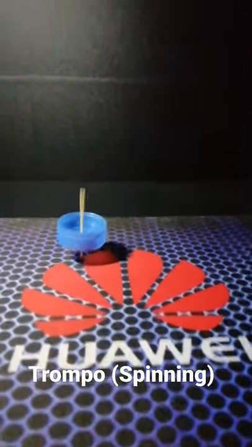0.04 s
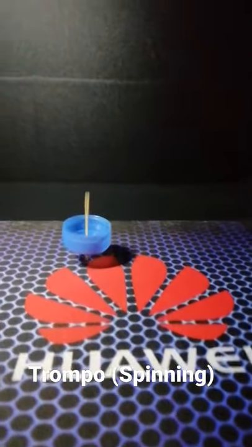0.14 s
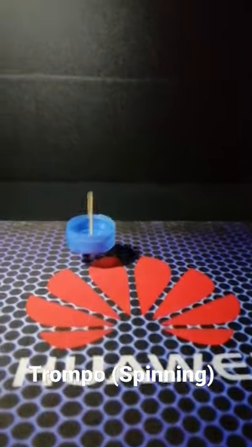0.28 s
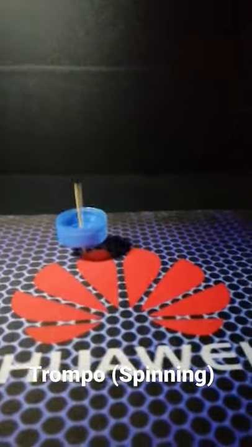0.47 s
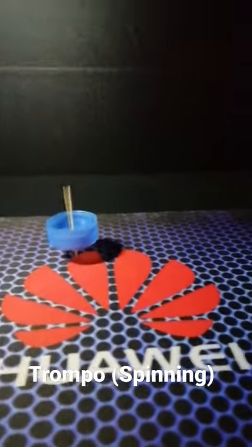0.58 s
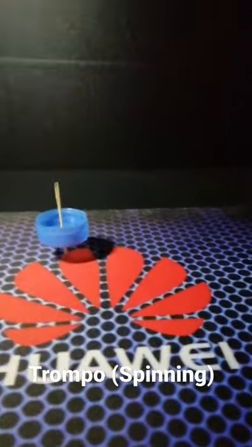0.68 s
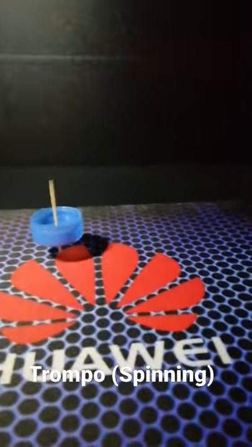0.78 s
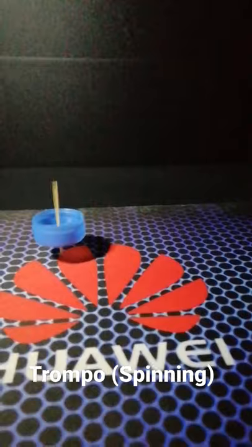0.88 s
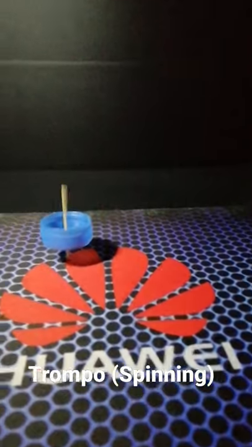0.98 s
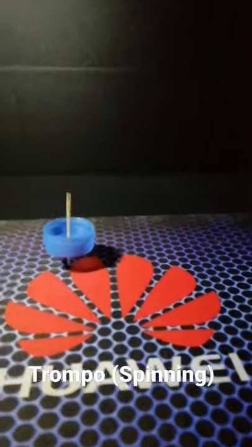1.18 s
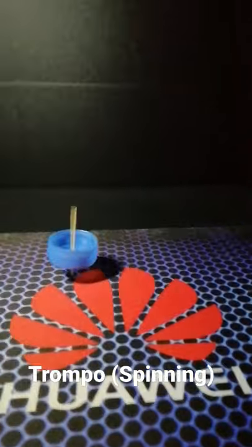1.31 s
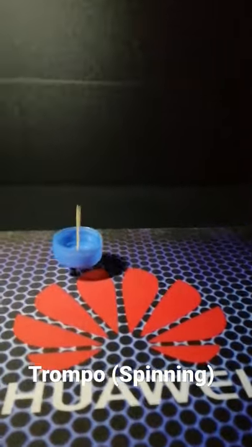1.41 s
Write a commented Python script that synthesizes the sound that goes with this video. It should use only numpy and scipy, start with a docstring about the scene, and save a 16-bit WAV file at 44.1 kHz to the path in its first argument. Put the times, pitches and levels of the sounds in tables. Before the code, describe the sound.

A small top spins on a mat, hissing and scraping, as something brushes the microphone.

```python
"""A bottle-cap top spins on a mat in a quiet room, a little nearer the left microphone than the right.
Its wooden tip hisses, rasps unevenly about twice a turn and catches in short scrapes.
Right on the microphone, something, probably a finger, ticks against the right port,
slides past it with two light taps and leaves.
Underneath lie room rumble and hiss, faint mains hum and soft handling noise."""
import sys
import numpy as np
from scipy import signal
from scipy.fft import rfft, irfft
from scipy.io import wavfile
from scipy.ndimage import uniform_filter1d, map_coordinates

SR = 44100
rng = np.random.default_rng(int(sys.argv[2]) if len(sys.argv) > 2 else 0)


def wrap_up_sound(samples):
    """Save the sound to the file named by the first command line argument, as 16-bit audio."""
    columns = np.atleast_2d(samples).T
    # keep every value between -1 and 1, then stretch to whole-number steps
    tamed = np.clip(columns, -1, 1)
    steps = np.round(tamed * 32767).astype(np.int16)
    wavfile.write(sys.argv[1], SR, steps)


N = 63945
TIME = np.arange(N) / SR


def amp(db):
    """Decibels to gain."""
    return 10 ** (np.asarray(db) / 20)


def unit_rms(x):
    """Scales to rms 1."""
    return x / np.sqrt(np.mean(x ** 2) + 1e-20)


def per_bin(points, size):
    """Reads a curve at each FFT bin, on a log-frequency axis."""
    hz, value = np.transpose(points)
    return np.interp(np.log(np.fft.rfftfreq(size, 1 / SR) + 1), np.log(hz + 1), value)


def fader(points):
    """A level curve as a gain for every sample."""
    return amp(np.interp(TIME, *np.transpose(points)))


def bump(s, width_s, db):
    """A gain that swells to a peak and falls again."""
    return amp(db) * np.exp(-.5 * ((TIME - s) / width_s) ** 2)


def pan(left_db):
    """Stereo gains, the left louder by left_db."""
    return amp([[left_db / 2], [-left_db / 2]])


def add(mix, s, sound):
    """Mixes a sound in at a time."""
    part = mix[..., max(round(s * SR), 0):][..., :sound.shape[-1]]
    part += sound[..., :part.shape[-1]]


def coloured(noise, spectrum):
    """Gives noise a spectrum, at rms 1."""
    size = noise.shape[-1]
    return unit_rms(irfft(rfft(noise) * amp(per_bin(spectrum, size)), size))


def stereo_noise(size, likeness=.65):
    """Noise that is partly alike at the two microphones."""
    left, other = rng.standard_normal((2, size))
    return np.array([left, likeness * left + np.sqrt(1 - likeness ** 2) * other])


def wander(samples):
    """Smooth random drift of rms 1."""
    return unit_rms(uniform_filter1d(uniform_filter1d(rng.standard_normal(N), samples), samples))


# Wooden tip on the mat, spectrum (f/Hz, relative level/dB)
TIP_SPECTRUM = [(1000, -36), (2600, -21.5), (3600, -23.5), (4650, -22), (5000, -15), (5750, -8.5),
                (6700, -25), (7600, -26), (8100, -1), (8450, 3), (8850, -2), (9500, -13.5), (11500, -20.5),
                (13800, -39), (15500, -29)]
# Its rasp between scrapes (t/s, level/dB)
RASP_LEVEL = [(0, -59), (.4, -57), (.75, -58.5), (.87, -59), (1.25, -62), (1.45, -60.5)]
def rasp(pressure):
    """The tip rubs the mat, louder as it presses harder."""
    return coloured(stereo_noise(N) * pressure, TIP_SPECTRUM) * fader(RASP_LEVEL)


# The tip's hiss: spectrum (f/Hz, relative level/dB) and course (t/s, level/dB)
HISS_SPECTRUM = [(2500, -43), (3600, -16), (4600, -20), (4950, 2), (5700, 0), (6500, -11), (7500, -25),
                 (9000, -5.5), (11300, -4.5), (12200, -2.5), (12700, -4), (13600, -44), (15400, 1)]
HISS_LEVEL = [(0, -63), (.35, -62.5), (.65, -61.5), (.8, -63.5), (.9, -66.5), (1.45, -69)]
def tip_hiss(pressure):
    """Steadier friction, stronger at first and mostly on the left microphone."""
    hiss = coloured(stereo_noise(N) * np.sqrt(pressure), HISS_SPECTRUM)
    return hiss * fader(HISS_LEVEL) * pan(left_db=12)


# Peaks of the scrapes on the mat (t/s, relative level/dB)
SCRAPES = [(.006, -39), (.036, -44), (.042, -44), (.056, -39), (.074, -51), (.083, -48), (.089, -46),
           (.111, -49), (.141, -43.5), (.215, -40), (.253, -35), (.287, -37), (.321, -37), (.783, -46),
           (.806, -41), (.842, -48), (.882, -41), (.920, -44.5), (.96, -42), (.977, -48), (.997, -38),
           (1.016, -41), (1.037, -42.5), (1.077, -41), (1.094, -42.5), (1.116, -42), (1.134, -49),
           (1.154, -56), (1.174, -40), (1.194, -44), (1.211, -37.5), (1.230, -45), (1.237, -44),
           (1.252, -43), (1.273, -44.5), (1.335, -45.5), (1.392, -47), (1.439, -43)]
def scrapes(width_s=.0029, gain_db=-18, sway_db=2):
    """The tip catches in short bursts, with sharper resonances than its rasp."""
    out = np.zeros((2, N))
    t = np.arange(-512, 512) / SR
    swell = np.exp(-.5 * (t / width_s) ** 2)
    sharpened = [(hz, db * 1.13) for hz, db in TIP_SPECTRUM]
    for s, db in SCRAPES:
        scrape = coloured(stereo_noise(len(t)) * swell, sharpened)
        gain = amp(db + gain_db) * pan(sway_db * rng.standard_normal())
        add(out, s + t[0], gain * scrape[:, s + t >= 0])
    return out


# Extra distance from the wandering top to the right microphone (t/s, path/m)
EXTRA_PATH = [(.05, 0.1), (.22, 0.09), (1.45, .082)]
def direct_sound(source, sound_m_per_s=343):
    """The right microphone, 8 to 10 cm farther off, hears the top later."""
    left, right = source
    lag_s = np.interp(TIME, *np.transpose(EXTRA_PATH)) / sound_m_per_s
    return np.array([left, map_coordinates(right, [np.arange(N) - lag_s * SR], order=5)])


def reflections(source, t60_s=.034, gain_db=-13):
    """The room returns a short, sparse tail, different at each microphone."""
    t = np.arange(SR // 4) / SR
    taps = rng.standard_normal((2, len(t)))
    taps *= (rng.random(taps.shape) < .05) & (t > .002)
    taps *= amp(-60 * t / t60_s)
    taps /= np.linalg.norm(taps, axis=1, keepdims=True)
    return amp(gain_db) * signal.fftconvolve(source, taps, axes=1)[:, :N]


def spinning_top(spin_hz=28.28, slowing_hz_per_s=2.48, depth_db=2.5, grain_db=2.44):
    """The slowing top bears on its tip twice a turn, unevenly."""
    turns = np.cumsum(spin_hz - slowing_hz_per_s * TIME) / SR
    pressure = amp(depth_db * np.cos(2 * np.pi * 2 * turns) + grain_db * wander(samples=120))
    tip = rasp(pressure) + tip_hiss(pressure) + scrapes()
    return direct_sound(tip) + reflections(tip)


# Room tone: spectrum (f/Hz, relative level/dB) and course (t/s, level/dB)
ROOM_SPECTRUM = [(20, -10), (50, 3.5), (75, -1.5), (125, -1), (170, -10.5), (300, -8.5), (600, -10.5),
                 (1100, -16.5), (2200, -23), (5000, -23), (8500, -15.5), (12000, -24.5), (15500, -19)]
ROOM_LEVEL = [(0, -62), (.17, -60.5), (.35, -60.5), (.8, -60), (1.45, -62.5)]
# How alike it is at the two microphones (f/Hz, correlation)
ROOM_LIKENESS = [(60, 1), (150, 0.43), (300, 0.51), (1000, 0.11), (4000, 0.02)]
def room_tone():
    """The quiet room: rumble, nearly mono in the bass, under wide hiss."""
    left, other = rfft(rng.standard_normal((2, N)))
    likeness = np.clip(per_bin(ROOM_LIKENESS, N), 0, 1)
    right = likeness * left + np.sqrt(1 - likeness ** 2) * other
    return coloured(irfft(np.array([left, right]), N), ROOM_SPECTRUM) * fader(ROOM_LEVEL)


# Mains harmonics in the room (f/Hz, level/dB)
HUM_PARTIALS = [(101, -73.5), (200, -73), (301, -81)]
def mains_hum():
    """The mains hums faintly in three steady tones."""
    return sum(amp(db) * np.sqrt(2) * np.sin(2 * np.pi * (hz * TIME + rng.random()))
               for hz, db in HUM_PARTIALS)


def friction(spectrum, grain_db=1.6):
    """Dense tiny slips of uneven size."""
    slips = rng.standard_normal(N) * amp(grain_db * np.minimum(rng.exponential(1, N), 6))
    return coloured(slips, spectrum)


# Early hiss on the right: spectrum (f/Hz, relative level/dB) and course (t/s, level/dB)
EARLY_HISS_SPECTRUM = [(2400, -42), (3500, -7), (4500, -7), (5200, 2.5), (5800, -2.5), (6050, -12),
                       (6350, 5.5), (6900, -27), (9000, -20), (14000, -20.5)]
EARLY_HISS_LEVEL = [(0, -61), (.2, -59.5), (.26, -56.5), (.36, -63.5), (.44, -76)]
def early_hiss():
    """Thin hiss on the right microphone, partly the top's tip, perhaps with a light graze of skin."""
    return friction(EARLY_HISS_SPECTRUM) * fader(EARLY_HISS_LEVEL)


# Handling at the recorder: spectrum (f/Hz, relative level/dB) and course (t/s, level/dB)
HANDLING_SPECTRUM = [(40, -18), (90, 0), (135, 2.5), (210, -2), (320, -14.5), (550, -12.5), (1200, -23),
                     (4000, -67)]
HANDLING_LEVEL = [(.05, -76), (.15, -62), (.3, -66.5), (.52, -70), (.8, -70.5)]
def handling():
    """A soft swell of low handling noise, mostly on the right microphone."""
    rumble = coloured(rng.standard_normal(N), HANDLING_SPECTRUM)
    return rumble * fader(HANDLING_LEVEL) * pan(left_db=-6)


# The slide past the right port, spectra (f/Hz, relative level/dB)
FIZZ_SPECTRUM = [(3000, -23.5), (6500, -13), (7700, -6.5), (8500, -1), (9500, -2), (11000, -7.5),
                 (12500, -8), (15400, -11)]
BRUSH_SPECTRUM = [(120, -34), (500, -1.5), (1200, -2.5), (2300, -1), (3300, 4), (4500, 2.5), (5500, 3.5),
                  (7000, -1), (9000, 8), (15000, -22)]
PRESS_SPECTRUM = [(100, -24), (250, -19), (900, -1), (2200, 0), (3000, 6), (4500, -16), (12000, -40)]
HOLLOW_SPECTRUM = [(650, -15), (1180, 6), (1750, 4), (2500, -27)]
# Courses of the bright fizz and the softer brush (t/s, level/dB)
FIZZ_LEVEL = [(.33, -64), (.36, -50), (.385, -46.5), (.41, -36.5), (.425, -36), (.44, -68), (.446, -39),
              (.455, -40.5), (.475, -40.5), (.545, -34), (.585, -40), (.615, -33), (.645, -46.5),
              (.73, -55), (.765, -46.5), (.83, -64), (.87, -96.5)]
BRUSH_LEVEL = [(.3, -70), (.38, -52), (.41, -43), (.428, -45.5), (.441, -70.5), (.456, -47), (.52, -44),
               (.6, -49), (.68, -52), (.77, -56), (.85, -72.5), (1.45, -72)]
def finger_slide():
    """Skin rubs the port, deeper under pressure and hollow where it almost covers it."""
    fizz = friction(FIZZ_SPECTRUM) * fader(FIZZ_LEVEL)
    brush = friction(BRUSH_SPECTRUM) * fader(BRUSH_LEVEL)
    press = friction(PRESS_SPECTRUM) * bump(s=.5235, width_s=.036, db=-51.5)
    hollow = friction(HOLLOW_SPECTRUM) * bump(s=.518, width_s=.013, db=-53)
    return fizz + brush + press + hollow


def ring(t, hz, rise_s):
    """A struck mode that swells and dies at once."""
    return t / rise_s * np.exp(1 - t / rise_s) * np.sin(2 * np.pi * hz * t)


# Modes of the microphone port (f/Hz, relative level/dB, rise/s)
PORT_MODES = [(8300, -1, 0.0002), (13500, -13, 0.00014)]
# Touches on the right microphone
# (t/s, snap level/dB, crunch level/dB, clack level/dB, knock level/dB, knock f/Hz, knock rise/s)
TOUCHES = [(.3482, -32, -29.5, -53, -34, 476, 0.00056), (0.4498, -16.8, -29, -27.5, -40.5, 253, 0.0014),
           (.5857, -44, -52, -40, -49, 700, 0.00085), (0.5928, -40, -39, -34.5, -43, 740, 0.00066)]
def finger_ticks(crunch_s=.00039):
    """Each touch snaps in the port, crunches, clacks on the case and gives a low knock."""
    out = np.zeros(N)
    t = np.arange(SR // 20) / SR
    snap = sum(amp(db) * ring(t, hz, rise_s) for hz, db, rise_s in PORT_MODES)
    clack = ring(t, hz=1630, rise_s=.00015)
    contact = np.sin(np.pi * np.minimum(t / crunch_s, 1))
    for s, snap_db, crunch_db, clack_db, knock_db, knock_hz, rise_s in TOUCHES:
        crunch = contact * rng.standard_normal(len(t))
        knock = ring(t, knock_hz, rise_s)
        add(out, s, amp(snap_db) * snap + amp(crunch_db) * crunch)
        add(out, s, amp(clack_db) * clack + amp(knock_db) * knock)
    return out


def scene():
    """Top and room on both microphones, the early hiss and the finger on the right only."""
    mix = spinning_top()
    mix += (room_tone() + mains_hum()) * pan(left_db=-1.5)
    mix += handling()
    mix[1] += (early_hiss() + finger_slide()) * amp(.8 * wander(samples=100))  # 0.8 dB flutter
    mix[1] += finger_ticks()
    return mix


def record(dry):
    """The recorder cuts off above 15.5 kHz."""
    lowpass = signal.firwin(511, 15500, window=("kaiser", 9), fs=SR)
    return signal.oaconvolve(dry, lowpass[None], "same")


dry = scene()
out = record(dry)
wrap_up_sound(out)
```